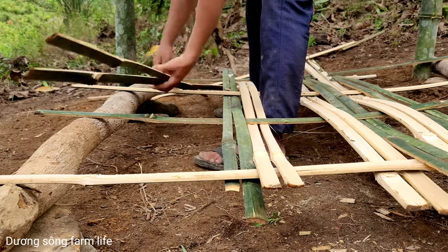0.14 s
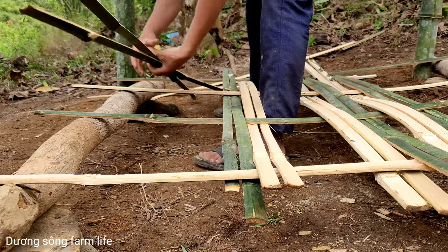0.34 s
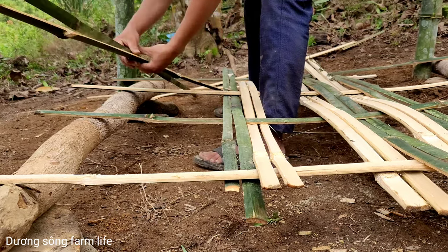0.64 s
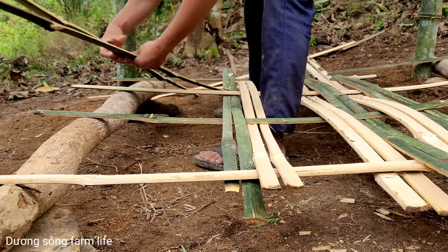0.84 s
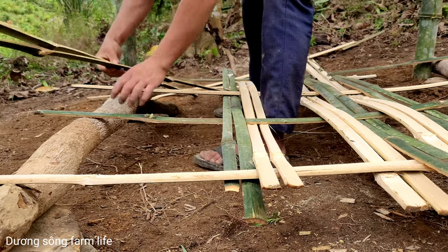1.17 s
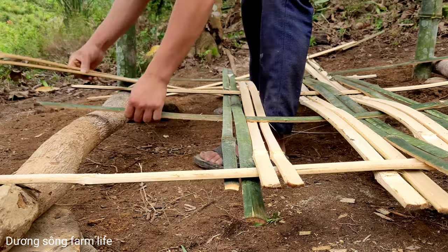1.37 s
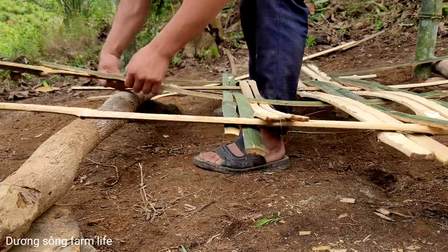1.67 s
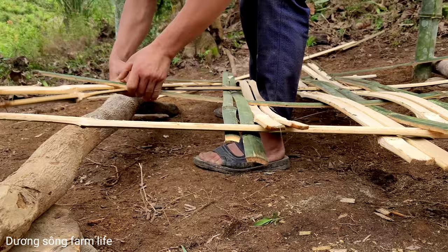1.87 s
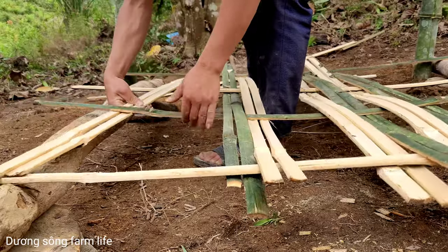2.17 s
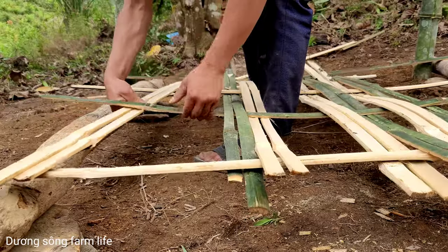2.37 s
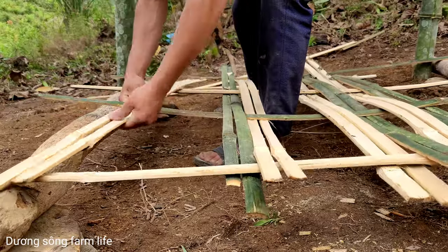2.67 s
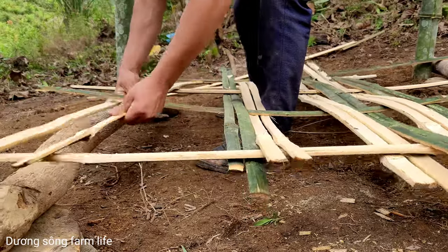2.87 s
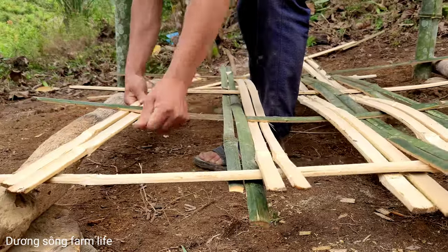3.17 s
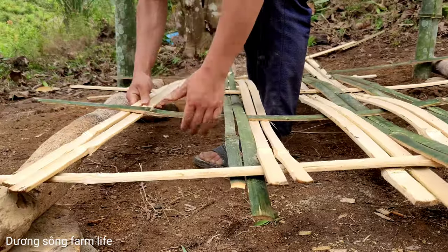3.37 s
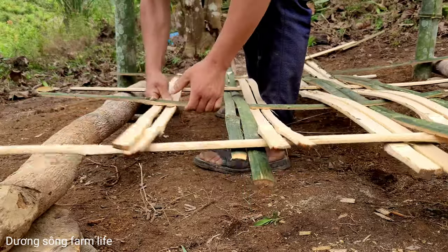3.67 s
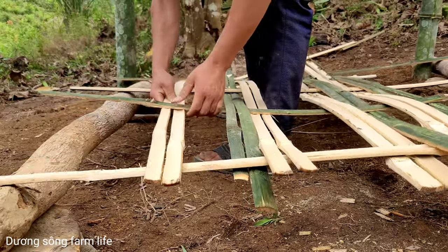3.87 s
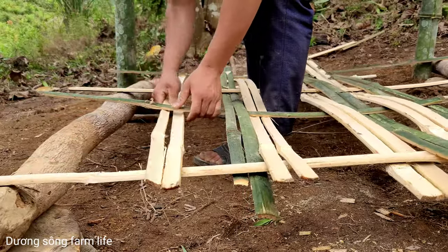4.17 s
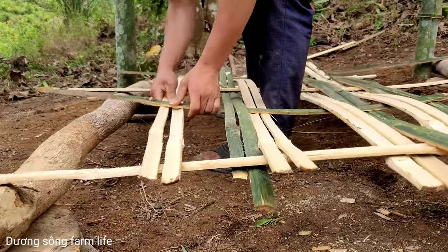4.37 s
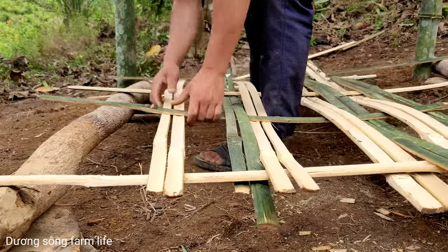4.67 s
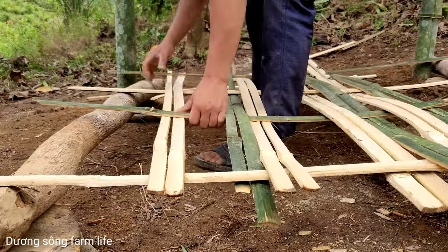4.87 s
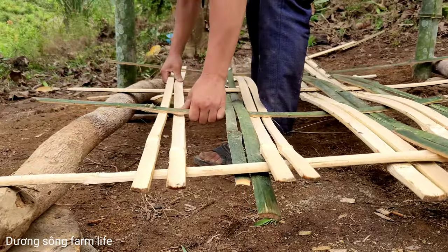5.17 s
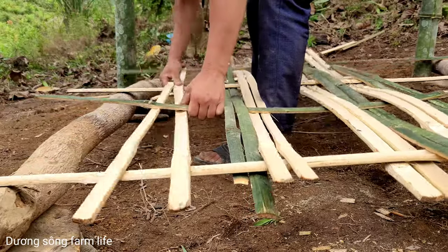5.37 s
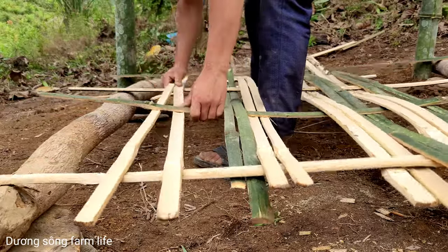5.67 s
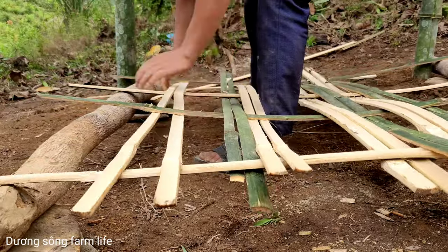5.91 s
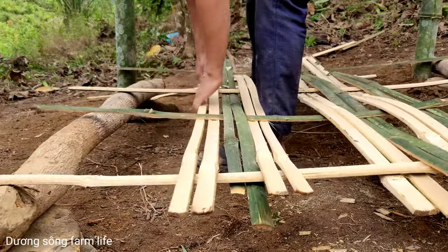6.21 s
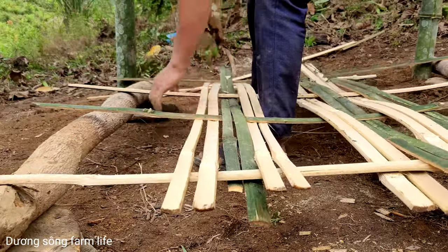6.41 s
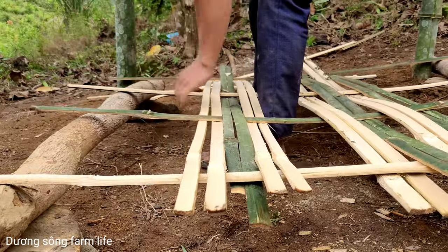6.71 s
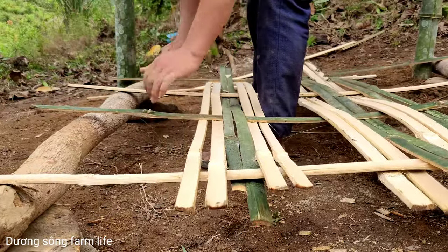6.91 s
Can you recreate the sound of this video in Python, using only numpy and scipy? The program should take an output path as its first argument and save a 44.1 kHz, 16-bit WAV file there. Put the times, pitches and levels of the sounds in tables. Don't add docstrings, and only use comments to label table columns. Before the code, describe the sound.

Outdoors, close and dry, with a very faint bed of grove air and thin high cicada hiss. From 0 to 1.5 s there are only soft leaf or sleeve brushes, tiny ticks and a light skid. Around 1.7 to 2.0 s strips slide and clack firmly, followed by lighter claps and brushing until 2.4 s. Woody clacks at 2.7 and 2.95 s lead to two hard, quick claps at 3.13 and 3.16 s with a dull soil thump. Smaller knocks and snaps scatter from 3.6 to 4.1 s. A hollow, woody cluster rattles from 4.5 to 4.8 s, then quiet. At 5.35 s a scrape and clatter build to the loudest, shortest crack at 5.47 s, with rebounds. From 6.19 to 6.3 s strips rattle, scrape and ring; a final tight group of hard claps hits at 6.62 s, then settles into quiet.

```python
import sys
import numpy as np
from scipy import signal
from scipy.fft import rfft, irfft, next_fast_len
from scipy.io import wavfile
from scipy.ndimage import uniform_filter1d

SR = 44100
rng = np.random.default_rng(int(sys.argv[2]) if len(sys.argv) > 2 else 0)


def materialize(psi):
    bounded = np.clip(np.atleast_2d(psi).T, -1, 1)
    quanta = np.round(bounded * 32767).astype(np.int16)
    wavfile.write(sys.argv[1], SR, quanta)


def undo_db(level):
    steps = np.asarray(level, float) / 20
    return 10 ** steps


N = 310893
TIME = np.arange(N) / SR
LEAD = 256
LEFT_LAG_MS, RIGHT_LAG_MS = -0.18, 0.33

# frequency in Hz, width in Hz, level in dB.
STRIP = [(118.6, 62, -7.5), (293, 41, 4.5), (517.4, 34, -1.5), (625, 94, -11), (845, 257, -6.5),
         (941, 89, -11.5), (1327, 170, -23)]


def resonances(hz, modes):
    hz = np.maximum(hz, 1.)
    response = 0
    for k, (mode_hz, width_hz, gain) in enumerate(modes):
        detuning = (hz - mode_hz ** 2 / hz) / width_hz
        response = response + (-1) ** k * gain / (1 + 1j * detuning)
    return response


def colour(hz, spectrum):
    f, db = np.transpose(spectrum)
    return undo_db(np.interp(np.log(np.maximum(hz, 1.)), np.log(f), db))


def shape(x, response, lag_ms=0.):
    size = next_fast_len(x.shape[-1])
    hz = np.arange(size // 2 + 1) * SR / size
    delay_s = np.array([[lag_ms], [-lag_ms]]) / 2000
    late = np.exp(-2j * np.pi * hz * delay_s)
    return irfft(rfft(x, size) * response(hz) * late, size)[:, :x.shape[-1]]


def pan(x, left_db):
    return x * undo_db(np.array([[left_db], [-left_db]]) / 2)


def pair(size, alike):
    mid, side = rng.standard_normal((2, size))
    alike = np.clip(alike, 0, .99)
    return np.sqrt(1 + alike) * mid + np.sqrt(1 - alike) * side * np.array([[1], [-1]])


def walk(rate, size=N):
    hold = max(int(SR / rate), 16)
    levels = np.repeat(rng.standard_normal(size // hold + 1), hold)
    return uniform_filter1d(levels, hold)[:size] * 1.2


def unit(x):
    return x / np.sqrt(np.mean(x.mean(axis=0) ** 2))


def add(out, s, x, db):
    at = int(s * SR) - LEAD
    scaled = undo_db(db) * x / np.abs(x.mean(axis=0)).max()
    out[:, at:at + x.shape[1]] += scaled[:, :N - at]


def in_order(*kinds):
    rows = []
    for table, *shared in kinds:
        rows += [tuple(row) + tuple(shared) for row in table]
    return sorted(rows)


def burst(rise_s, t60, tail_db, tail_t60, grit_db, grit_rate, alike, size, hold=0.74):
    t = np.maximum(np.arange(size) - LEAD, 0) / SR
    fall = undo_db(-60 * (t / max(t60, .008)) ** hold) + undo_db(tail_db - 60 * t / tail_t60)
    rise = 1 - np.exp(-t / rise_s)
    fade = np.cos(np.pi / 2 * t / t[-1])
    noise = pair(size=size, alike=alike)
    return noise * fall * rise * fade * undo_db(grit_db * walk(grit_rate, size=size))


def claps(rows):
    # frequency in Hz, level in dB per Hz.
    crack = [(600, -14.5), (1100, -5.5), (2500, -2.5), (6000, -2.5), (8500, -8), (12500, -14), (15800, -25),
             (16600, -62)]
    out = np.zeros((2, N))
    for s, db, ring_hz, treble_db, t60, wood_db, ring_db in rows:
        spots = 1500 * undo_db(np.linspace(0, 16, num=14) + 0.98 * rng.standard_normal(14))
        modes = [(f, .05 * f, undo_db(2.0 * g - 6)) for f, g in zip(spots, rng.standard_normal(14))]
        ring = [(ring_hz, 0.051 * ring_hz, undo_db(ring_db)), (ring_hz, .5 * ring_hz, -undo_db(-11.0))]

        def body(hz):
            wood = undo_db((wood_db + 19.0) / (1 + (hz / 2600) ** 4))
            broad = colour(hz, crack) * wood * (1 + resonances(hz, modes)) / (1 + (hz / 7000) ** 4)
            return broad + resonances(hz, ring) / (1 + (hz / 11000) ** 8)

        def snap(hz):
            high = 1 / (1 + (7000 / np.maximum(hz, 1.)) ** 4)
            return undo_db(treble_db + 19.5) * colour(hz, crack) * high

        lag_ms, left_db = rng.standard_normal(2) * [.3, .4] + [0, 1.2]
        chatter = burst(0.0011, 0.59 * t60, -23.0 - ring_db, 0.25, 2.1, 900, 0.29, size=8192, hold=1.3)
        x = shape(chatter, body, lag_ms)
        contact = burst(0.00072, 0.27 * t60, -32.5, 0.43, 4.24, 900, 0.79, size=8192, hold=1.77)
        x = x + shape(contact, snap, lag_ms)
        add(out, s - .0006, pan(x, left_db), db)
    return out


def working_claps():
    # start in seconds, peak in dB, ring in Hz, treble in dB re peak.
    edge_claps = [
        (0.6885, -49, 4960, -22),
        (2.1954, -29, 3380, -38),
        (2.2164, -41.5, 2500, -16),
        (2.3972, -26, 5400, -4),
        (2.7074, -35.5, 3995, -8),
        (3.2112, -28, 2550, -18),
        (3.842, -30.5, 4520, -22),
        (5.1585, -38.5, 4370, -21),
        (6.0877, -49, 5160, -29),
        (6.6252, -13, 4530, -22),
    ]
    face_claps = [(1.5044, -42.5, 4190, -9), (1.7638, -45, 4380, -14), (1.9746, -26, 5800, -20),
                  (1.9973, -17, 4370, -18), (2.1343, -41, 4600, -31), (3.178, -26.5, 3860, -26),
                  (3.194, -27.5, 4400, -22), (4.35, -40, 2500, -37), (4.4932, -38, 1800, -24),
                  (4.5423, -43, 2000, -31), (4.59, -33, 4730, 1), (4.7744, -38, 4020, -25),
                  (4.816, -37, 4300, -36), (5.3802, -25, 5000, -11), (5.6197, -33.5, 4080, -33),
                  (5.7928, -42, 5130, -9), (6.1854, -31, 4200, -23), (6.2163, -14.5, 3110, -15),
                  (6.3775, -42.5, 5150, -27)]
    edge_skids = [
        (0.7991, -43, 6050, -7),
        (2.9344, -32.5, 4400, -13),
        (5.3507, -29.5, 5000, -8),
        (5.3955, -21, 3490, -13),
        (5.7533, -41, 4900, -17),
        (6.2322, -16, 4120, -24),
        (6.599, -32, 4260, -24),
    ]
    face_skids = [
        (1.727, -35, 4900, -13),
        (4.7097, -28, 4060, -36),
        (4.7502, -30.5, 2240, -28),
        (4.9023, -44, 3600, -26),
        (5.3867, -17, 3840, -20.5),
        (6.1919, -16.5, 4450, -11.5),
    ]
    snaps = [
        (2.7177, -26, 4050, -33),
        (3.8846, -38, 4180, -30),
        (4.0023, -39, 4470, -37),
        (4.0896, -29, 5280, -21),
        (4.6115, -19.5, 5660, -12),
        (5.2212, -35.5, 6640, -7.5),
        (5.5118, -20.5, 3960, -14),
    ]
    hard_claps = [
        (3.1264, -4, 4410, -17, 0.051),
        (3.1586, -5, 4410, -15.5, 0.043),
        (5.4724, 0.5, 5400, -13.5, 0.033),
        (6.6221, -5.5, 3320, -10, 0.045),
    ]
    woody_claps = [
        (2.9534, -17.5, 4350, -14.5, 0.068),
        (3.9611, -22.5, 5300, -39, 0.048),
        (4.5792, -14, 2030, -28, 0.062),
        (4.6898, -12.5, 3900, -13, 0.068),
        (6.6384, -9, 4500, -12.5, 0.036),
    ]
    ringing_claps = [
        (6.2818, -7, 4310, -32, 0.045),
    ]
    return claps(in_order(
        (edge_claps, 0.055, -20, 6.5),
        (face_claps, 0.061, -11.5, 6.5),
        (edge_skids, 0.17, -20, 6.5),
        (face_skids, 0.12, -11.5, 6.5),
        (snaps, 0.04, -18.5, 0.5),
        (hard_claps, -23.5, 4),
        (woody_claps, -12, 3),
        (ringing_claps, -18.5, 19.5)))


def rebounds():
    # start in seconds, peak in dB, ring in Hz, treble in dB re peak.
    chatters = [
        (2.966, -33, 4400, -21),
        (5.479, -17, 4380, -19),
        (5.491, -27, 4500, -11.5),
        (6.2215, -21.5, 4200, -22),
        (6.245, -24, 5200, -27),
        (6.262, -30, 4500, -24),
        (6.2915, -25, 4330, -30),
    ]
    return claps(in_order((chatters, 0.04, -20, 6.5)))


def knocks(rows, lag_ms):
    out = np.zeros((2, N))
    for s, db, ring_hz, t60, hollow_db in rows:
        share = undo_db(5.13 * rng.standard_normal(len(STRIP)))
        modes = [(f, w, undo_db(g - 9) * a) for (f, w, g), a in zip(STRIP, share)]
        modes.append((ring_hz, 0.074 * ring_hz, 1.))
        modes.append((STRIP[1][0], 45., undo_db(hollow_db + 5)))
        modes.append((800, 1100, undo_db(-9.5)))
        x = burst(0.0004, 0.71 * t60, -28, 0.48, 1.9, 307, 0.93, size=10240, hold=1.214)
        x[:, LEAD + 44] += undo_db(20.5)
        x = shape(pan(x, -1.5), lambda hz: resonances(hz, modes) / (1 + (hz / 1300) ** 4), lag_ms)
        add(out, s - .001, x, db)
    return out


def left_knocks():
    # start in seconds, peak in dB, ring in Hz, time to fall 60 dB in seconds.
    hollow_knocks = [(0.042, -48.5, 435, 0.42), (0.068, -44, 550, 0.27), (1.595, -46, 960, 0.23),
                     (1.84, -41, 544, 0.12), (1.994, -33.5, 570, 0.22), (2.336, -38.5, 526, 0.31),
                     (3.496, -47, 626, 0.24), (4.577, -20, 836, 0.067), (5.352, -42.5, 960, 0.19),
                     (5.447, -32, 444, 0.091), (6.197, -27.5, 780, 0.063), (6.259, -27, 537, 0.15),
                     (6.6, -37, 700, 0.29)]
    strip_knocks = [(0.641, -50.5, 755, 0.17), (1.508, -51.5, 730, 0.11), (1.726, -42, 775, 0.19),
                    (2.195, -43, 796, 0.15), (2.721, -30.5, 786, 0.12), (2.821, -38.5, 750, 0.09),
                    (2.93, -34.5, 432, 0.39), (2.952, -28.5, 1004, 0.11), (2.989, -53, 785, 0.094),
                    (3.139, -24.5, 830, 0.14), (3.646, -33.5, 796, 0.17), (3.699, -48, 931, 0.14),
                    (3.823, -28, 794, 0.1), (3.961, -32, 1190, 0.093), (4.352, -43, 1010, 0.27),
                    (5.385, -25.5, 790, 0.13), (5.409, -28, 790, 0.099), (5.474, -24, 734, 0.066),
                    (5.533, -26, 530, 0.18), (5.562, -28, 920, 0.18), (5.592, -24, 563, 0.11),
                    (5.738, -40, 890, 0.13), (5.891, -40.5, 480, 0.074), (5.977, -35.5, 614, 0.27),
                    (6.09, -31, 580, 0.15), (6.216, -19, 755, 0.19), (6.617, -26, 674, 0.23)]
    log_knocks = [(0.303, -52, 1190, 0.25), (0.853, -44.5, 790, 0.31), (0.919, -52, 796, 0.17),
                  (1.404, -53.5, 467, 0.33), (1.914, -57, 780, 0.1), (1.95, -47, 780, 0.11),
                  (2.215, -40.5, 538, 0.16), (2.371, -33, 764, 0.14), (2.481, -42.5, 537, 0.45),
                  (3.123, -24, 750, 0.29), (3.156, -21, 554, 0.14), (3.208, -29, 814, 0.081),
                  (4.081, -29, 604, 0.15), (4.611, -16.5, 810, 0.11), (5.61, -43, 660, 0.16),
                  (5.755, -27, 532, 0.096), (6.239, -28, 690, 0.089), (6.379, -30.5, 557, 0.059),
                  (6.641, -23.5, 804, 0.097)]
    rows = in_order((hollow_knocks, 2.5), (strip_knocks, -7), (log_knocks, -40))
    return knocks(rows, LEFT_LAG_MS)


def woven_knocks():
    # start in seconds, peak in dB, ring in Hz, time to fall 60 dB in seconds,
    # hollow mode in dB re peak.
    woven = [
        (2.101, -29, 380, 0.21, -1.5),
        (3.845, -25, 963, 0.067, -9),
        (4.486, -33, 640, 0.18, -31),
        (4.689, -17, 1040, 0.17, -4.5),
        (4.711, -26.5, 526, 0.16, -7),
        (4.748, -28.5, 830, 0.2, -41),
        (6.282, -26.5, 528, 0.13, -4),
    ]
    return knocks(woven, RIGHT_LAG_MS)


def settling():
    # start in seconds, peak in dB, ring in Hz, time to fall 60 dB in seconds.
    small_knocks = [(3.114, -40, 800, 0.08), (3.147, -31, 950, 0.087), (4.636, -33, 814, 0.065),
                    (4.657, -38, 500, 0.14), (4.672, -39, 605, 0.1), (4.7, -26.5, 540, 0.13),
                    (5.476, -22.5, 748, 0.058), (5.603, -27.5, 800, 0.06), (6.234, -26, 607, 0.1),
                    (6.253, -28, 560, 0.1), (6.268, -29.5, 590, 0.11), (6.301, -30.5, 512, 0.08)]
    return knocks(in_order((small_knocks, -11.5)), LEFT_LAG_MS)


def pressure(strokes, levels_db, idle_db):
    press_db_per_s, let_go_db_per_s = 116, 117
    power = undo_db(2 * idle_db)
    for (s, held_s, *_), db in zip(strokes, levels_db):
        before_db = press_db_per_s * np.maximum(s - TIME, 0)
        after_db = let_go_db_per_s * np.maximum(TIME - s - held_s, 0)
        power = power + undo_db(2 * (db - before_db - after_db))
    return np.sqrt(power)


def slide():
    # full pressure from in seconds, held in seconds,
    # edge hiss in dB, body rumble in dB.
    strokes = [(0.0, 0.097, -66, -59.5), (0.67, 0.018, -60, -61.5), (0.9, 0.023, -68.5, -63),
               (1.59, 0.4, -59.5, -58), (2.0, 0.012, -51, -46.5), (2.368, 0.01, -52.5, -47.5),
               (2.5, 0.21, -60, -69), (2.8, 0.21, -60.5, -56), (3.218, 0.0063, -50, -50.5),
               (3.36, 0.36, -62.5, -63.5), (3.69, 0.046, -51.5, -51.5), (3.9, 0.092, -64, -54),
               (4.18, 0.023, -61, -57.5), (4.53, 0.27, -60, -51), (4.67, 0.026, -65, -46.5),
               (5.0, 0.21, -66.5, -68.5), (5.492, 0.049, -45, -42.5), (5.75, 0.07, -61.5, -59.5),
               (6.0, 0.12, -67.5, -57), (6.261, 0.04, -49, -42), (6.601, 0.22, -62.5, -64)]
    # start in seconds, stop in seconds, edge hiss in dB.
    drags = [
        (1.72, 1.79, -53),
        (2.27, 2.38, -48.5),
        (3.617, 3.69, -55.5),
        (5.346, 5.469, -43),
        (6.225, 6.274, -35),
        (2.96, 3, -49),
        (6.645, 6.69, -47),
        (5.485, 5.53, -45.5),
        (3.17, 3.2, -43.5),
        (4.7, 4.76, -45.5),
    ]
    # frequency in Hz, level in dB per Hz.
    edge_hiss = [(710, -48.5), (1200, 0.5), (1980, -4.5), (2920, -1.5), (3740, -1), (4220, 1.5), (6300, -6),
                 (12300, -9), (16000, -13)]
    _, _, edge_db, body_db = np.transpose(strokes)
    grit = pair(size=N, alike=0.049) * undo_db(1.4 * walk(400) + 2.0 * walk(43))
    edge = shape(grit, lambda hz: colour(hz, edge_hiss))
    modes = [(f, w, undo_db(db)) for f, w, db in STRIP]
    rumble = pair(size=N, alike=0.9) * undo_db(2.0 * walk(83))
    body = shape(rumble, lambda hz: resonances(hz, modes), LEFT_LAG_MS)
    drag = 0
    for start, stop, db in drags:
        drag = drag + undo_db(db) * np.interp(TIME, [start - .02, start, stop, stop + .005], [0, 1, 1, 0])
    edge_level = np.hypot(pressure(strokes, edge_db, idle_db=-69), drag)
    return unit(edge) * edge_level + unit(body) * pressure(strokes, body_db, idle_db=-70.5)


def thumps():
    # frequency in Hz, width in Hz, level in dB.
    soil = [(56.2, 29, 11), (68.3, 29, 5), (106, 21, -5)]
    # start in seconds, peak in dB.
    bounces = [(0.077, -62), (1.377, -61), (2.005, -53), (2.157, -41), (2.369, -56), (3.16, -32),
               (3.637, -56), (3.851, -40), (3.959, -48), (4.158, -41.5), (4.388, -50), (4.47, -47),
               (4.584, -31), (4.671, -27), (4.76, -40), (5.415, -35), (5.528, -44), (5.649, -47),
               (6.096, -38), (6.225, -44), (6.422, -58), (6.614, -51.5)]
    # start in seconds, peak in dB.
    landings = [
        (1.851, -46.5),
        (2.493, -40.5),
        (2.735, -47.5),
        (2.962, -49),
        (4.085, -38.5),
        (5.77, -36),
        (6.804, -44),
    ]
    out = np.zeros((2, N))
    t = np.maximum(np.arange(16384) - LEAD, 0) / SR
    modes = [(f, w, undo_db(db)) for f, w, db in soil]
    for s, db, t60 in in_order((bounces, 0.24), (landings, 0.12)):
        swing_hz = soil[0][0] * undo_db(0.74 * rng.standard_normal())
        decay = (1 - np.exp(-t / 0.0051)) * undo_db(-60 * t / (0.57 * t60))
        swing = decay * np.sin(2 * np.pi * swing_hz * t)
        scuffle = burst(0.015, 0.92 * t60, -33.0, 0.27, 1.8, 60, 0.9, size=len(t))
        push = undo_db(-29.0) * swing + scuffle
        add(out, s, shape(push, lambda hz: resonances(hz, modes) / (1 + 1j * hz / 160) ** 2), db)
    return pan(out, -2)


def rustles():
    # start in seconds, peak in dB.
    brushes = [
        (0.0494, -63.5),
        (0.4194, -57),
        (0.504, -50),
        (0.6355, -56),
        (1.1603, -60),
        (1.9, -43),
        (2.089, -49),
        (2.298, -40),
        (3.5994, -63),
        (5.3194, -48),
    ]
    out = np.zeros((2, N))
    for s, db in brushes:
        x = burst(0.0051, 0.12, -50, .2, 2.0, 300, .05, size=16384, hold=2.9)
        add(out, s, shape(x, lambda hz: resonances(hz, [(10400, 12000, 1.)]) ** 2), db)
    return out


def grove():
    # time in seconds, low choir in dB, high choir in dB.
    cicadas = [(0.0, -77, -68.5), (0.55, -72, -66), (1.0, -76, -80), (1.55, -70.5, -86), (1.96, -79, -61.5),
               (3.53, -73, -83), (3.83, -74, -65), (4.1, -75, -67.5), (5.3, -68.5, -75.5),
               (5.461, -76, -76), (5.83, -84, -67.5), (6.44, -73.5, -70.5), (7.05, -75, -85)]
    # frequency in Hz, level in dB per Hz.
    air_tone = [(25, -11.5), (55, 1.5), (150, 0), (400, -4), (1000, -4.5), (1900, -4), (3100, -12),
                (5800, -13.5), (8200, -7), (9200, -25), (15500, -31)]
    s, low_db, high_db = np.transpose(cicadas)
    choirs = [(4450, 190, np.interp(TIME, s, low_db)),
              (5150, 560, np.interp(TIME, s, high_db)),
              (7070, 260, -75.5)]
    out = 0
    for centre_hz, width_hz, db in choirs:
        band = shape(pair(size=N, alike=.2), lambda hz: resonances(hz, [(centre_hz, width_hz, 1.)]) ** 2)
        out = out + unit(band) * undo_db(db + 0.5 + 1.7 * walk(25))

    def low(hz):
        return colour(hz, air_tone) / np.sqrt(1 + (hz / 500) ** 2)

    def high(hz):
        return colour(hz, air_tone) / np.sqrt(1 + (500 / np.maximum(hz, 1.)) ** 2)

    bass = shape(pair(size=N, alike=0.82), low)
    air = shape(pair(size=N, alike=.02), high)
    return out + unit(bass + air) * undo_db(-58.5 - 4.0 + walk(1.995))


def scene():
    strips = left_knocks() + woven_knocks()
    soft = shape(slide() + grove() + rustles(), lambda hz: hz < 15500)
    blows = working_claps() + strips + thumps()
    return soft + blows + rebounds() + settling()


def low_pass(x):
    return signal.sosfilt(signal.butter(12, 16290, fs=SR, output="sos"), x)


def record(dry):
    bass_cut = signal.butter(4, 46, "high", fs=SR, output="sos")
    mix = np.clip(signal.sosfilt(bass_cut, dry), -1, 1)
    return low_pass(mix)


dry = scene()
out = record(dry)
materialize(out)
```